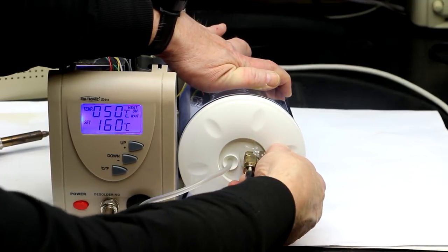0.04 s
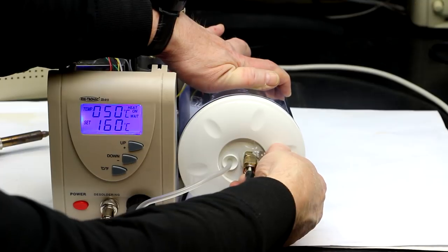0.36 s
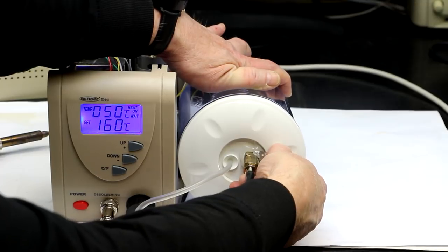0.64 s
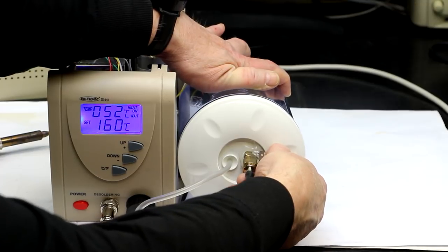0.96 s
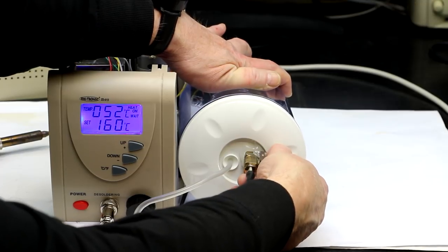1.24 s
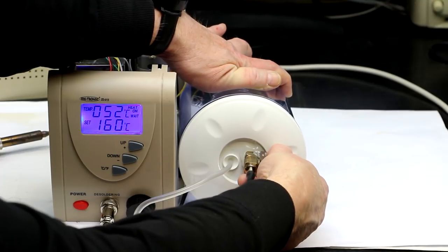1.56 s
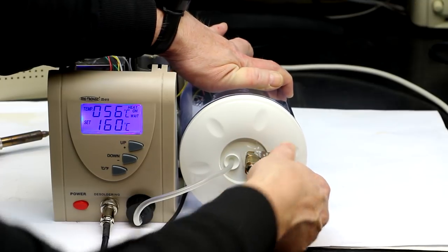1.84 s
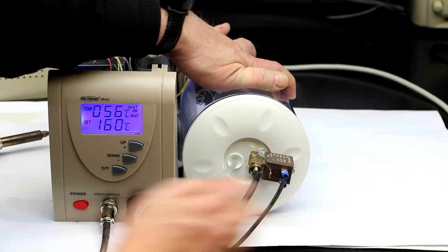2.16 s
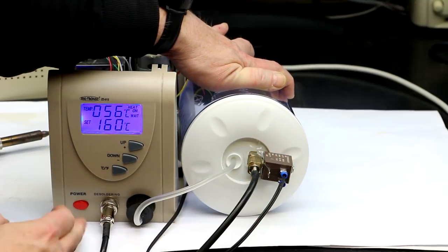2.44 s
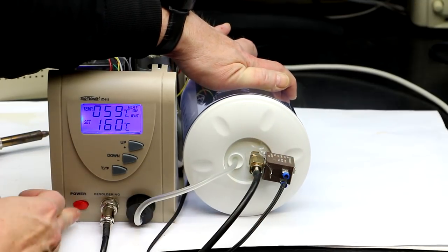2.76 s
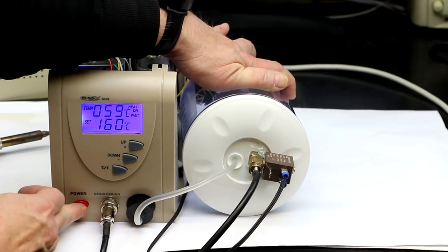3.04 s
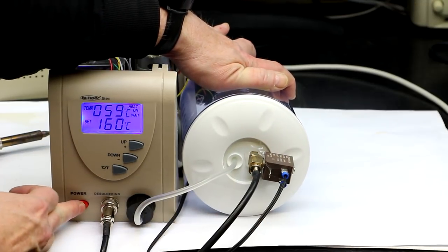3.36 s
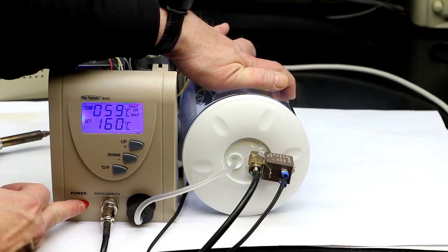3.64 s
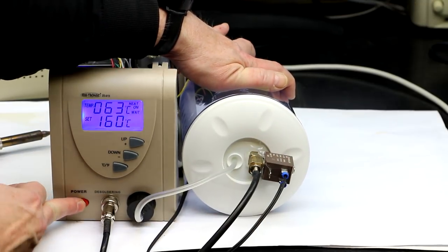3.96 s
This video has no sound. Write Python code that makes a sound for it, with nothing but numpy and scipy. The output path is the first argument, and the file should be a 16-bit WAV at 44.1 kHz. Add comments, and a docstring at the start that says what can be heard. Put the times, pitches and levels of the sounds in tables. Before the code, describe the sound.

A small vacuum pump drones nearby on a workbench at an even pitch, with a thin airy hiss. Handling adds a few barely audible low bumps, then a single small click while the buzzing carries on.

```python
"""Vacuum pump of a desoldering station.

The pump runs steadily on a workbench, about 79 strokes a second. Each stroke rings the housing
and hose near 1 kHz and lets out a puff of air. An arm in front of the machine is drawn away
halfway through, which changes the colour; handling gives soft bumps and one click."""
import sys
import numpy as np
from scipy import signal
from scipy.fft import rfft, irfft
from scipy.io import wavfile
from scipy.ndimage import uniform_filter1d

SR = 44100
rng = np.random.default_rng(int(sys.argv[2]) if len(sys.argv) > 2 else 0)


def log_audio(samples):
    """Write samples as a 16-bit WAV file to the path given in sys.argv[1]."""
    # one column per channel
    frames = np.atleast_2d(samples).T
    # limit to full scale, then quantise
    limited = np.clip(frames, -1, 1)
    pcm = np.round(limited * 32767).astype(np.int16)
    wavfile.write(sys.argv[1], SR, pcm)


N = 176400

# Pump speed. Each row: time in seconds, strokes per second (one per turn of the shaft).
STROKE_RATE = [(0, 78.94), (0.4, 79.1), (1.2, 79.08), (1.6, 79.17), (2.1, 79.19), (2.8, 79.2), (3.3, 79.16),
               (4, 79.24)]
TREBLE_HZ = 3400  # the hiss is combed and flickers mainly above this


def amp(db):
    """Decibels to amplitude ratio."""
    return 10 ** (np.asarray(db) / 20)


def unit(x):
    """Normalisation to rms 1."""
    return x / np.sqrt(np.mean(x ** 2) + 1e-20)


def curve(points):
    """Linear interpolation of (seconds, value) points at every sample."""
    return np.interp(np.arange(N) / SR, *np.transpose(points))


def spectrum_at(freqs, values, hz):
    """Interpolation of a spectrum on a log-frequency axis."""
    return np.interp(np.log(hz + 1), np.log(np.add(freqs, 1)), values)


def drift(hz):
    """Low-pass noise of rms 1: a random fluctuation up to about the given rate."""
    freqs = np.fft.rfftfreq(N, 1 / SR)
    return unit(irfft(rfft(rng.standard_normal(N)) * np.exp(-(freqs / hz) ** 2), N))


def bench_bumps(hz=110, rise_s=.018):
    """Damped vibration: the nudged bench gives a soft low note."""
    # Each row: start in seconds, peak level in dB.
    nudges = [(0.766, -49), (2.009, -58), (2.065, -57)]
    out, t = np.zeros(N), np.arange(SR // 2) / SR
    note = t / rise_s * np.exp(1 - t / rise_s) * np.sin(2 * np.pi * hz * t)
    for start, db in nudges:
        add(out, start, amp(db) * note)
    return out


def add(mix, start, sound):
    """Superposition: a sound joins the mix at a start time in seconds."""
    part = mix[round(start * SR):][:len(sound)]
    part += sound[:len(part)]


def click(snap_band_hz=(3400, 10500), snap_db=-2, snap_t60_s=.011):
    """Impact excitation: a small hard part touches and seats, with a snap and briefly ringing modes."""
    # Each row: start in seconds, level in dB.
    contacts = [(2.6275, -41), (2.6302, -29.5)]
    # Each row: frequency in Hz, level in dB relative to the contact, time to fall 60 dB in seconds.
    modes = [(3817, -13, .014), (4300, -2, 0.019), (4640, -5.5, .025), (5350, -6, .012), (8050, -17, .008)]
    out, t = np.zeros(N), np.arange(SR // 10) / SR
    band = signal.butter(3, snap_band_hz, "bandpass", fs=SR, output="sos")
    ring = sum(amp(db - 60 * t / t60) * np.sin(2 * np.pi * hz * t) for hz, db, t60 in modes)
    for start, level_db in contacts:
        burst = amp(snap_db - 60 * t / snap_t60_s) * rng.standard_normal(len(t))
        add(out, start, amp(level_db) * (ring + signal.sosfilt(band, burst)))
    return out


def reflections(x, count=24, longest_s=.012, echo_db=-4.5):
    """Comb filtering: echoes from the bench and nearby things interfere with the direct treble."""
    taps, hz = np.zeros(N), np.fft.rfftfreq(N, 1 / SR)
    delays = (rng.uniform(.05, 1, count) * longest_s * SR).astype(int)
    taps[delays] = rng.choice([-1., 1.], count) * amp(echo_db) / np.sqrt(count)
    treble = hz ** 2 / (hz ** 2 + TREBLE_HZ ** 2)
    comb = (1 + treble * rfft(taps)) / np.hypot(1, treble * amp(echo_db))
    return irfft(rfft(x) * comb, N)


def flicker(x, depth_db=1):
    """Random amplitude modulation: narrow patches of the treble swell and fade."""
    hz, _, frames = signal.stft(x, SR, nperseg=1024)
    patches = uniform_filter1d(rng.standard_normal(frames.shape), size=5, axis=0)
    patches = unit(uniform_filter1d(patches, size=40, axis=1))
    treble = np.clip(hz / TREBLE_HZ - 1, 0, 1)[:, None]
    return signal.istft(frames * amp(depth_db * treble * patches), SR, nperseg=1024)[1][:N]


def rushing_air(turns, away, gain_db=.5, steady_flow=.6, scatter_db=2.5):
    """Flow noise: a steady rush of air and rumble swells in a puff with every stroke."""
    # Each row: frequency in Hz, relative density in dB with the arm in front, then with it away.
    air_spectrum = [(20, -93, -95), (88, -91, -91), (108, -74.5, -73), (130, -87.5, -86), (298, -84.5, -84),
                    (423, -79, -79), (800, -73, -76), (905, -63.5, -73), (1160, -81, -78), (1510, -79, -78),
                    (1880, -85, -86.5), (2800, -87, -88), (4050, -85, -86), (4450, -87.5, -85.5),
                    (5100, -94.5, -93), (5500, -89, -92.5), (6200, -88, -91.5), (6560, -95, -97),
                    (7500, -93.5, -99), (8900, -97.5, -96.5), (9700, -95, -90.5), (10400, -94, -98),
                    (10900, -91, -93), (11300, -101, -95.5), (11900, -91, -93.5), (13300, -96, -93.5),
                    (15700, -99, -95)]
    onset, rise, fade = .16, .072, .16  # of the puff, in turns
    age = (turns - onset) % 1
    puff = np.minimum(age / rise, 1) * np.exp(-np.maximum(age - rise, 0) / fade)
    flow = steady_flow + puff * amp(scatter_db * drift(STROKE_RATE[0][1]))
    freqs, front_db, away_db = np.transpose(air_spectrum)
    out, hz = np.zeros(N), np.fft.rfftfreq(N, 1 / SR)
    for db, power_share in ((front_db, 1 - away), (away_db, away)):
        rush = reflections(unit(flow * rng.standard_normal(N)))
        out += np.sqrt(power_share) * irfft(rfft(rush) * amp(spectrum_at(freqs, db, hz)), N)
    return amp(gain_db) * np.sqrt(SR / 2) * flicker(out)


def stroke(ring_db, size=4096, floor_db=-80, buzz_scatter_db=2):
    """Impulse response over one turn: a sudden push rings the housing, with a thin buzz above."""
    # Resonances that delay part of the ring, so it swells again. Each row: centre in Hz, width in Hz.
    resonances = [(376, 247), (950, 6)]
    # Each row: frequency in Hz, relative level of a buzz harmonic in dB.
    buzz_spectrum = [(3500, -66), (4500, -67), (5000, -77), (5500, -71), (6300, -82), (7500, -81)]
    hz = np.arange(size // 2 + 1) * np.mean(np.array(STROKE_RATE)[:, 1])
    buzz_from = len(ring_db) + 1
    db = np.r_[ring_db[0], ring_db, np.full(len(hz) - buzz_from, floor_db)]
    log_magnitude = np.log(amp(np.r_[db, db[-2:0:-1]]))
    lines = np.exp(np.conj(signal.hilbert(log_magnitude)))[:len(hz)]  # minimum phase: a causal ring
    for centre, width in resonances:
        lines *= np.exp(-2j * np.arctan2(width / 2, centre - hz))  # all-pass delay
    buzz_db = spectrum_at(*np.transpose(buzz_spectrum), hz)
    buzz = amp(buzz_db + buzz_scatter_db * rng.standard_normal(len(hz))) * (hz < buzz_spectrum[-1][0])
    lines[buzz_from:] = (buzz * np.exp(2j * np.pi * rng.random(len(hz))))[buzz_from:]
    lines[0] = 0
    return irfft(lines, size) * size / np.sqrt(2)


def pump_hum(turns, away, gain_db=-1.5, waver_db=.05, waver_hz=8.1):
    """Periodic excitation: repeated strokes form a harmonic series, recoloured as the arm leaves."""
    # Each row: multiple of the stroke rate, relative level in dB with the arm in front, then away.
    harmonics = [(1, -49.5, -50.5), (2, -57, -58.5), (3, -46.5, -46.5), (4, -52.5, -54.5), (5, -41, -40),
                 (6, -43, -44), (7, -40.5, -42), (8, -34, -36), (9, -29.5, -31), (10, -28, -31.5),
                 (11, -27, -28.5), (12, -26.5, -29.5), (13, -23.5, -22.5), (14, -59, -55), (15, -40, -37.5),
                 (16, -54.5, -49), (17, -46, -44), (18, -49, -50.5), (19, -50.5, -46), (20, -57, -51.5),
                 (21, -54.5, -62.5), (22, -57.5, -62), (23, -63.5, -58), (24, -64, -62.5), (25, -62, -60),
                 (26, -66.5, -58), (27, -53, -57), (28, -57.5, -52), (29, -65.5, -54.5), (30, -59, -70),
                 (31, -63, -57), (32, -60, -58.5), (33, -64, -59), (34, -57, -52.5), (35, -71, -108),
                 (36, -64.5, -87), (37, -55.5, -54.5), (38, -58.5, -56), (39, -64, -65.5), (40, -71, -64.5),
                 (41, -87, -77), (42, -69, -62), (43, -57, -62), (44, -71, -69)]
    _, front_db, away_db = np.transpose(harmonics)
    shaded, clear = (np.interp(turns, np.arange(len(cycle)) / len(cycle), cycle, period=1)
                     for cycle in (stroke(front_db), stroke(away_db)))
    return amp(gain_db + waver_db * drift(waver_hz)) * ((1 - away) * shaded + away * clear)


def scene():
    """Phase locking: hum and puffs follow one shaft; handling noises lie on top."""
    # Each row: time in seconds, how far the arm is out of the way from 0 to 1.
    arm_path = [(1.8, 0), (2.08, 0.7), (2.28, 0.8), (2.7, 0.79), (3.6, 0.91)]
    start_turn, jitter_turns = .172, .0003
    turns = start_turn + np.cumsum(curve(STROKE_RATE)) / SR + jitter_turns * drift(hz=22)
    away = curve(arm_path)
    return (pump_hum(turns, away) + rushing_air(turns, away) + bench_bumps() + click())[None]


def record(dry, cutoff_hz=15750):
    """Band limiting: a steep low-pass filter removes the highest treble."""
    lowpass = signal.firwin(511, cutoff_hz, window=("kaiser", 9), fs=SR)
    return signal.oaconvolve(dry, lowpass[None], "same")


dry = scene()
out = record(dry)
log_audio(out)
```